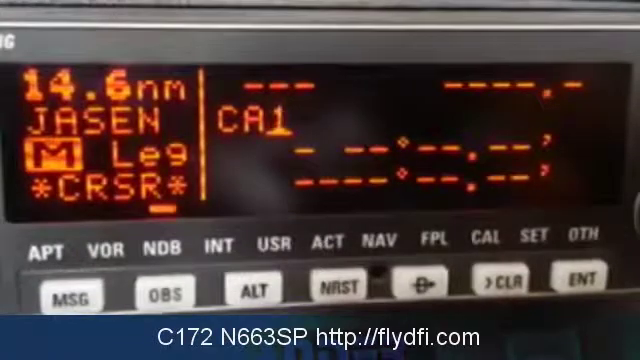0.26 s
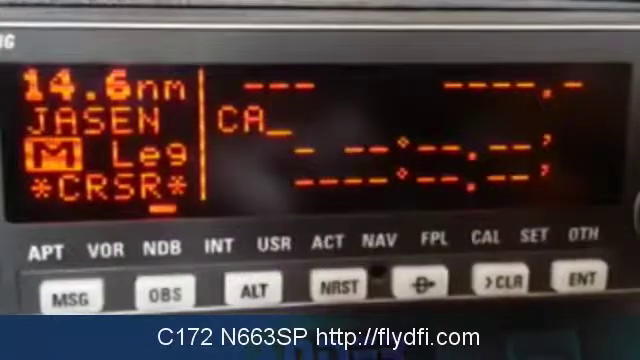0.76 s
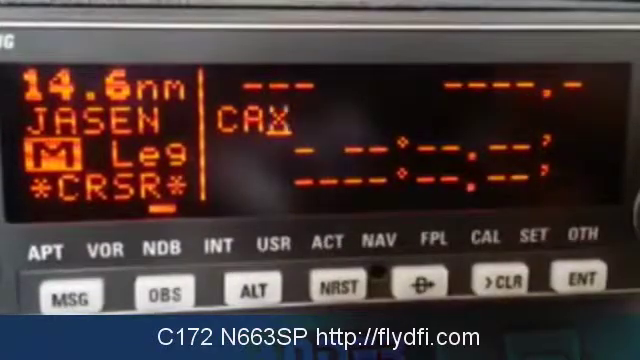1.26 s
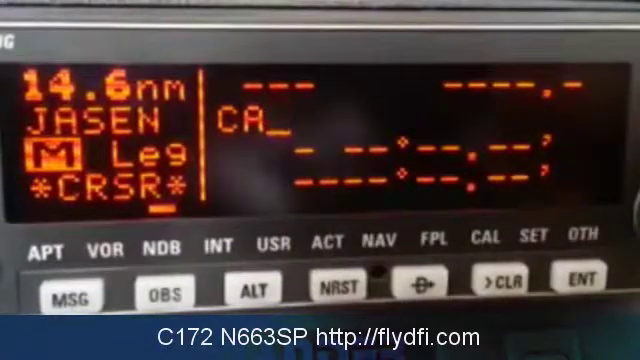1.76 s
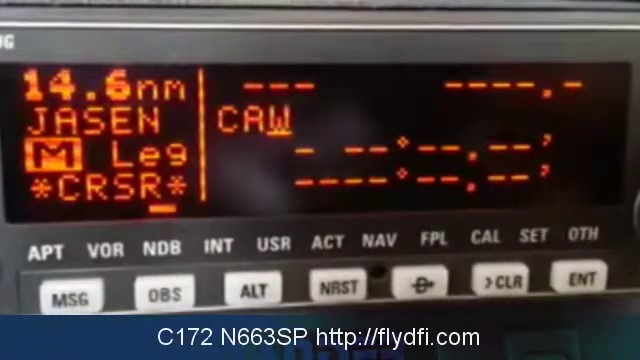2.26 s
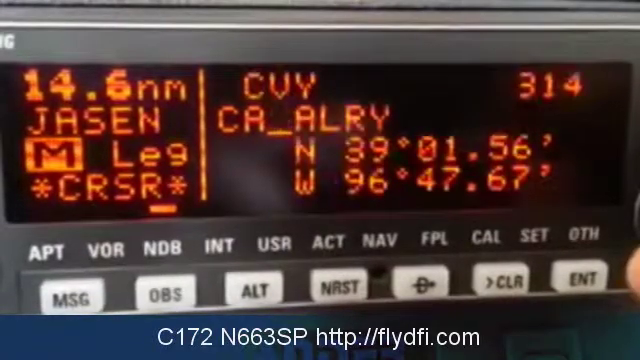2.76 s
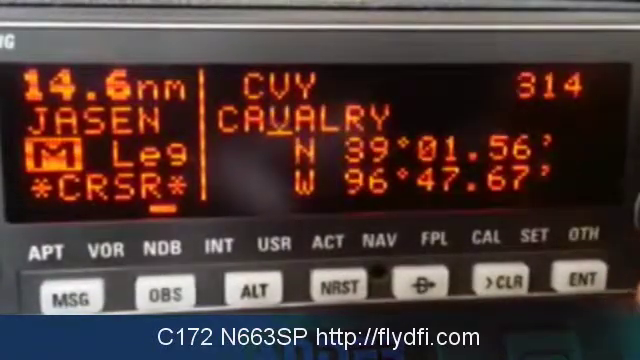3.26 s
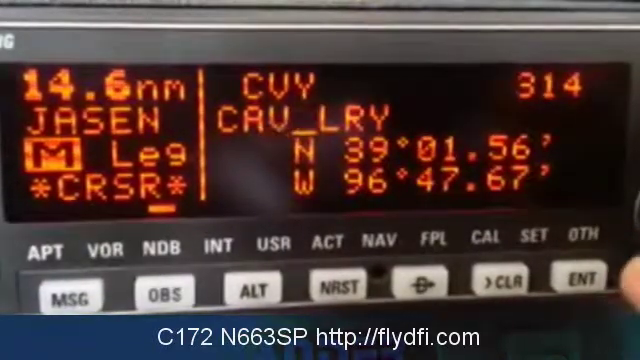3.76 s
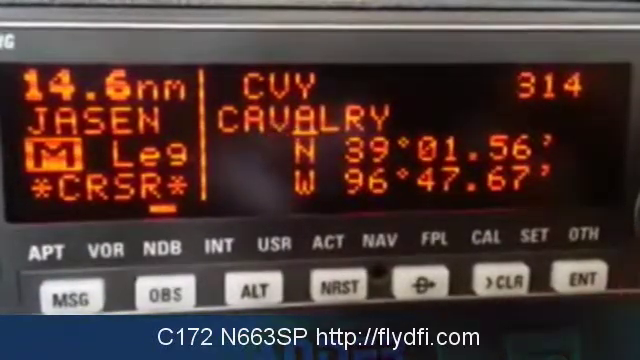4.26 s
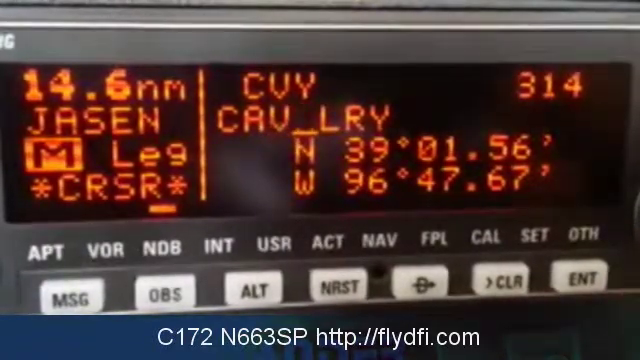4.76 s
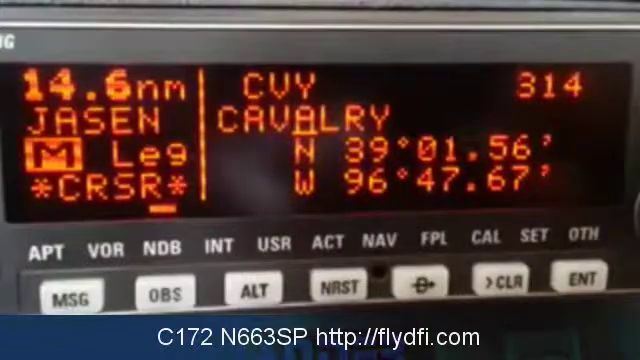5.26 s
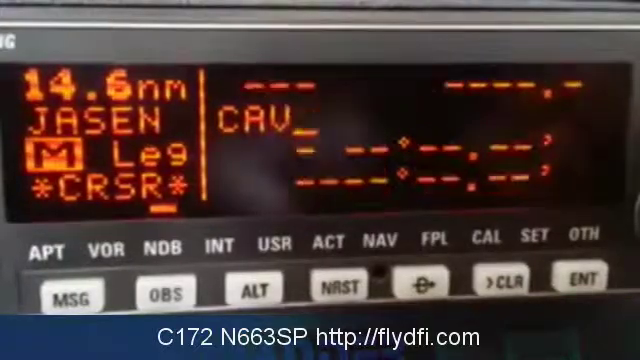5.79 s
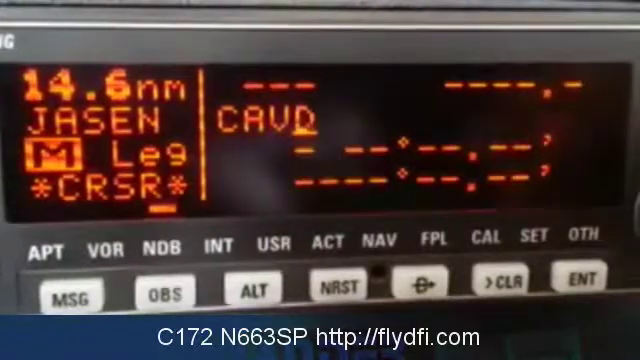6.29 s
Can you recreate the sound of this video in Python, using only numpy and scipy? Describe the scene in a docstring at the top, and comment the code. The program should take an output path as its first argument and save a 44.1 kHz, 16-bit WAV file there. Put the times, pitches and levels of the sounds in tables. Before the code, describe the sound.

A notched rotary knob on a panel-mounted navigation unit is turned step by step in a quiet, parked aircraft cockpit, heard close and in stereo. From 0.2 to 1.4 seconds come six sharp, unevenly spaced clicks, each a springy snap with slightly different tone, a tiny faceplate ring and a very short cabin reflection. A softer, tightly doubled click follows at about 2.3 seconds. Then there is a lull with barely audible finger rubs on the knob and soft hand bumps on the panel. A light, dry, bright tick sounds at 3.7 seconds and a tiny one at 5. Turning resumes with a hard click at 5.7 seconds and two somewhat softer ones at 5.9 and 6.3, the last with a faint dull bump. Very faint, steady rumble and hiss continue underneath throughout.

```python
"""Detented knob of a panel-mounted navigation unit, turned step by step in a quiet, parked cockpit.
At each step a spring rides up a cam and snaps into the next notch; knob and faceplate ring and the
small cabin answers. Fingers rub the knob and the hand bumps the panel, over faint rumble and hiss.
Heard close, in stereo. The hardest snaps clip briefly."""
import sys
import numpy as np
from scipy import signal
from scipy.fft import rfft, irfft
from scipy.io import wavfile
from scipy.ndimage import uniform_filter1d

SR = 44100
rng = np.random.default_rng(int(sys.argv[2]) if len(sys.argv) > 2 else 0)


def persist_wave(psi):
    """Save psi, clipped to +-1, as 16-bit WAV."""
    counts = np.round(np.clip(psi, -1, 1) * 32767).astype(np.int16)
    wavfile.write(sys.argv[1], SR, np.atleast_2d(counts).T)


N = 287884

# Inner knob steps. Each row: start in seconds, gain in dB, four tilts in dB (thump under 1 kHz,
# knock near 1.6 kHz, clack near 3.3 kHz, ping above 6 kHz), favoured ring in Hz, cancelled band in Hz.
INNER_STEPS = [(0.2075, -5.5, 5.5, 4, .5, 1.5, 3460, 2420), (0.3306, -10, 8.5, 4, 1, 2, 3940, 2300),
               (0.5746, -11.5, 6.5, -5, -1.5, 5, 7300, 2200), (0.9153, -9, 6, 0, 2, 3, 3100, 3780),
               (1.0562, -6, 4.5, -1.5, 0, .5, 2834, 3826), (1.4170, -8, -1.5, 1.5, 2.5, -2.5, 1550, 2293),
               (2.2495, -15, 5, 2, 1.5, -5, 1580, 3376), (2.2578, -19, 2, 3, 2, -3, 1600, 3600),
               (5.0036, -39, 7, -2.5, 2.5, 8, 10330, 2380), (5.667, -4.5, 1, -3.5, -2, -5.5, 3450, 4140),
               (5.9168, -12.5, 6.5, 3.5, -.5, -.5, 8800, 3440), (6.2819, -13, 8, 1.5, 7, 2, 1020, 2480)]
# One step of the outer ring: light, dry, bright. One row, same columns.
OUTER_RING_STEP = (3.7398, -24.5, 4.5, -9, -5, -1, 10470, 4040)
# Spring snap. Each row: frequency in Hz, relative density in dB.
SNAP_SPECTRUM = [(60, -38), (350, -28.5), (900, -19), (1500, -6), (2400, -7), (3300, -4), (5000, -2),
                 (6300, -1), (8000, 0), (9200, -8.5), (11000, -18)]
# Treble beamed at the right capsule. Each row: frequency in Hz, right minus left in dB.
SNAP_BEAM = [(1000, -3), (3400, -6), (6000, 1), (7200, 15), (8200, 8.5), (10000, 4.5)]
# Snap stereo image. Each row: frequency in Hz, left-right correlation.
SNAP_CORRELATION = [(300, .8), (1400, .2), (2300, .55), (5000, .15), (8000, -0.2)]
# Dense, short-lived faceplate modes. Each row: frequency in Hz, relative density in dB.
PLATE_SPECTRUM = [(60, -29), (350, -26.5), (900, -11), (1450, 0.5), (1900, 0), (2400, -7.5), (3300, 2),
                  (4800, 1.5), (6300, -0.5), (8000, -3), (9200, -11), (11000, -20.5)]
# Knob and faceplate modes. Each row: frequency in Hz, gain in dB, t60 in seconds, right minus left in dB.
KNOB_MODES = [(1457.5, -20.5, 0.048, -1), (1730, -19.5, .03, -3), (2790, -22, 0.02, -1),
              (3100, -17.5, .025, 0), (3620, -18, 0.015, 1.5), (4080, -15, .028, -1.5),
              (4860, -16.5, 0.029, -0.5), (5670, -16.5, 0.07, 2.5), (5980, -13.5, .025, 1),
              (6978, -11, 0.013, 13.5), (7520, -8.5, .011, 14.5), (9200, -20, 0.013, 5.5)]
# Cabin tail. Each row: frequency in Hz, relative density in dB.
CABIN_SPECTRUM = [(40, -10), (90, -2.5), (170, -12), (400, -9.5), (700, -8), (1100, -4), (1550, 1),
                  (2500, 4), (3200, -0.5), (4000, 1), (4800, 1), (6500, 1), (8000, -2), (8500, -8),
                  (9800, -6), (11000, -22.5)]
# Cabin stereo image. Each row: frequency in Hz, left-right correlation.
CABIN_CORRELATION = [(100, .4), (300, 0.66), (600, 0.39), (1400, 0.11), (2300, 0.13), (4000, .1),
                     (9000, 0.067)]
# Panel and cavity resonances in the tail. Each row: centre in Hz, width in Hz, lift in dB.
PANEL_RESONANCES = [(317.2, 45, 10.5), (522, 65, 8.5), (715, 83, 5), (810, 50, 6.5), (1131.5, 80, 5),
                    (1400, 25, 4), (1480, 50, 1.5), (1980, 71, 1), (3186, 170, 3), (4650, 250, 3),
                    (5250, 140, 3.5), (5620, 140, 2.5)]
# Brief level dips after three hard snaps. Each row: centre in seconds, gain in dB.
LEVEL_DIPS = [(0.2232, -60), (1.4313, -51), (5.685, -14)]
# Finger rubs on the knob. Each row: peak time in seconds, level in dB.
FINGER_RUBS = [(2.949, -53.5), (3.454, -63), (3.737, -47), (5.17, -63), (5.815, -61), (5.907, -50),
               (6.171, -50.5)]
# Sliding skin. Each row: frequency in Hz, relative density in dB.
RUB_SPECTRUM = [(30, -6), (100, 7), (400, 2.5), (1000, -6), (2500, -3.5), (4000, -6), (8000, -2),
                (11000, -10)]
# Catching skin. Each row: frequency in Hz, relative density in dB.
CATCH_SPECTRUM = [(1000, -20), (3000, -10), (4200, 0), (5500, -10), (11000, -14)]
# Hand bumps on the panel. Each row: start in seconds, gain in dB, resonance in Hz.
HAND_BUMPS = [(2.4065, -47, 440), (2.943, -51.5, 370), (4.025, -55.5, 519.5), (4.085, -61, 296.6),
              (6.284, -33, 530)]
# Background rumble and hiss. Each row: frequency in Hz, relative density in dB.
FLOOR_SPECTRUM = [(15, -36.5), (25, -13.5), (59, 3.5), (86, -6), (117, -1), (150, -5), (214, -5),
                  (403, -8.5), (457, -10), (635, -14), (976, -18), (4680, -20.5), (8580, -18), (10500, -29),
                  (13600, -54.5), (22000, -120)]
# Background stereo image. Each row: frequency in Hz, left-right correlation.
FLOOR_CORRELATION = [(50, .2), (300, .5), (1500, .3), (8000, 0.23)]

HIT_SAMPLES, LEAD_S = 16384, .02
HIT_GRID_HZ = np.fft.rfftfreq(HIT_SAMPLES, 1 / SR)


def knob():
    """The inner knob turns in runs; between them the outer ring moves one notch."""
    out = np.zeros((2, N))
    for start_s, *row in INNER_STEPS:
        add(out, detent(*row, ring_db=6.5, cabin_db=-12.8), start_s - LEAD_S)
    start_s, *row = OUTER_RING_STEP
    add(out, detent(*row, ring_db=19.5, cabin_db=-22.5), start_s - LEAD_S)
    return out


def detent(gain_db, thump_db, knock_db, clack_db, ping_db, ring_hz, hollow_hz, ring_db, cabin_db):
    """One step: snap, ring and a cabin tail of the same colour with a milder favoured ring."""
    t = np.arange(HIT_SAMPLES) / SR - LEAD_S
    tilts_db = thump_db, knock_db, clack_db, ping_db
    colour = (*tilts_db, ring_hz, ring_db, hollow_hz)
    tail_colour = (*tilts_db, ring_hz, .4 * ring_db, hollow_hz)
    ripple_db = chatter_db(HIT_GRID_HZ)
    panel_db = sum(db * bell(HIT_GRID_HZ, hz, width_hz) for hz, width_hz, db in PANEL_RESONANCES)
    direct = snap(t, hit_colour_db(HIT_GRID_HZ, *colour) + ripple_db) + ring(t, colour)
    tail = cabin(t, hit_colour_db(HIT_GRID_HZ, *tail_colour) + ripple_db + panel_db)
    lean_right = from_db(spread(1 + .3 * ping_db))
    return from_db(gain_db) * (lean_right * direct + from_db(cabin_db) * tail)


def snap(t, colour_db, contact_s=.0013, ride_db=-17):
    """The spring scrapes over the cam, chatters into its notch and excites the dense plate modes."""
    ride = from_db(ride_db) * decay(-t, t60_s=.01)
    contact = (t >= 0) * decay(np.maximum(t - contact_s, 0), t60_s=.006)
    beam_db = spread(at_hz(SNAP_BEAM, HIT_GRID_HZ))
    crack = burst(ride + contact, SNAP_SPECTRUM, SNAP_CORRELATION, colour_db + beam_db)
    plate = burst(decay(t, t60_s=.03), PLATE_SPECTRUM, SNAP_CORRELATION, colour_db)
    return from_db(-4) * crack + from_db(-5.5) * plate


def hit_colour_db(hz, thump_db, knock_db, clack_db, ping_db, ring_hz, ring_db, hollow_hz):
    """Grip and speed tilt each snap and favour one ring; the spring's bounce cancels one band."""
    tilt_db = at_hz([(700, thump_db), (1400, knock_db), (2000, knock_db), (3000, clack_db),
                     (3600, clack_db), (4500, 0), (5600, 0), (7000, ping_db)], hz)
    return tilt_db + ring_db * bell(hz, ring_hz, width_hz=600) - 13 * bell(hz, hollow_hz, width_hz=330)


def chatter_db(hz, scale_db=2.6):
    """Tiny impacts within a snap interfere, leaving ripples a few hundred Hz wide."""
    knots_hz = np.linspace(0, SR / 2, 140)
    ripple = rng.standard_normal(len(knots_hz))
    return scale_db * np.interp(hz, knots_hz, ripple - uniform_filter1d(ripple, size=5))


def ring(t, colour, scatter_db=1.5, left_lag_s=.0001):
    """Each snap strikes the modes with its own strengths; they reach the left capsule later."""
    out = 0
    age_s = t - np.array([[left_lag_s], [0]])
    for k, (hz, db, t60_s, right_db) in enumerate(KNOB_MODES):
        strength, detune = rng.standard_normal(2)
        gain = from_db(db + hit_colour_db(hz, *colour) + scatter_db * strength + spread(right_db))
        swing = (-1) ** k * np.cos(2 * np.pi * hz * (1 + .012 * detune) * age_s)
        out = out + gain * decay(age_s, t60_s) * swing
    return out


def cabin(t, colour_db, build_s=.004, late_db=-35.5):
    """Reflections off close walls and windows thicken and die fast; a faint late ring remains."""
    build = 1 - np.exp(-np.maximum(t, 0) / build_s)
    fall = np.hypot(decay(t, t60_s=.168), from_db(late_db) * decay(t, t60_s=.51))
    return burst(build * fall, CABIN_SPECTRUM, CABIN_CORRELATION, colour_db)


def dip_gain(half_width_s=.0053):
    """The knob's level dips briefly."""
    t = np.arange(N) / SR
    return from_db(sum(db * np.exp(-((t - s) / half_width_s) ** 4) for s, db in LEVEL_DIPS))


def fingers(rub_tau_s=.021, catch_tau_s=.0016, catch_lift_db=6):
    """Skin slides on the ribbed knob in swells of hiss and catches at the top of each."""
    t = np.arange(N) / SR
    swell, catch = (sum(from_db(db) * np.exp(-abs(t - s) / tau_s) for s, db in FINGER_RUBS)
                    for tau_s in (rub_tau_s, catch_tau_s))
    slide = swell * noise(RUB_SPECTRUM, CABIN_CORRELATION, N)
    scrape = catch * noise(CATCH_SPECTRUM, CABIN_CORRELATION, N)
    return slide + from_db(catch_lift_db) * scrape


def bumps(attack_s=.002, t60_cycles=40, puff_db=-3.5):
    """A soft hand contact wakes a low panel resonance and a dull puff around it."""
    out = np.zeros((2, N))
    t = np.arange(HIT_SAMPLES) / SR
    for start_s, db, hz in HAND_BUMPS:
        spectrum = [(hz / 4, -14), (hz, 0), (hz * 2, -11), (hz * 4, -40)]
        puff = from_db(puff_db) * noise(spectrum, CABIN_CORRELATION, HIT_SAMPLES)
        envelope = (1 - np.exp(-t / attack_s)) * decay(t, t60_cycles / hz)
        add(out, from_db(db) * envelope * (np.sin(2 * np.pi * hz * t) + puff), start_s)
    return out


def background(rms_db=-67.5):
    """Faint, steady rumble and hiss."""
    return from_db(rms_db) * noise(FLOOR_SPECTRUM, FLOOR_CORRELATION, N)


def burst(envelope, spectrum, correlation, colour_db):
    """Noisy push through a minimum-phase filter, so every peak rings on after it."""
    cepstrum = irfft(np.log(unit_gain(spectrum, HIT_SAMPLES) * from_db(colour_db)))
    cepstrum[..., 1:HIT_SAMPLES // 2] *= 2
    cepstrum[..., HIT_SAMPLES // 2 + 1:] = 0
    push = envelope * irfft(white_pair(correlation, HIT_SAMPLES))
    return irfft(rfft(push) * np.exp(rfft(cepstrum)))


def noise(spectrum, correlation, samples):
    """Steady stereo noise, rms 1."""
    return irfft(white_pair(correlation, samples) * unit_gain(spectrum, samples), samples)


def white_pair(correlation, samples):
    """Spectra of two correlated white noises."""
    mid, side = rfft(rng.standard_normal((2, samples)))
    alike = np.clip(at_hz(correlation, np.fft.rfftfreq(samples, 1 / SR)), -1, 1)
    return np.sqrt((1 + alike) / 2) * mid + np.sqrt((1 - alike) / 2) * side * [[1], [-1]]


def unit_gain(spectrum, samples):
    """FFT gains that shape white noise and keep its rms."""
    gain = from_db(at_hz(spectrum, np.fft.rfftfreq(samples, 1 / SR)))
    return gain / np.sqrt(np.mean(gain ** 2))


def at_hz(points, hz):
    """Interpolate over log frequency."""
    knots_hz, values = np.transpose(points)
    return np.interp(np.log(hz + 1), np.log(knots_hz), values)


def bell(hz, centre_hz, width_hz):
    """Gaussian of height 1; width at half height."""
    return np.exp(-np.log(2) * np.square(2 * (hz - centre_hz) / width_hz))


def decay(t, t60_s):
    """Zero before t = 0, then down 60 dB per t60_s."""
    return (t >= 0) * from_db(-60 * np.maximum(t, 0) / t60_s)


def spread(right_db):
    """Split right-minus-left dB over both channels."""
    return np.array([[-.5], [.5]]) * right_db


def from_db(db):
    return 10 ** (np.asarray(db) / 20)


def add(out, sound, start_s):
    """Mix a sound in at start_s."""
    start = round(start_s * SR)
    out[:, start:start + sound.shape[1]] += sound[:, :N - start]


def scene():
    """Knob and hand over the background."""
    floor = background()
    return dip_gain() * knob() + fingers() + bumps() + floor


def record(dry):
    """The hardest peaks clip; a steep low-pass cuts the top."""
    cutoff_hz = 10750
    lowpass = signal.ellip(10, .1, 70, cutoff_hz, fs=SR, output="sos")
    return signal.sosfilt(lowpass, np.clip(dry, -1, 1))


dry = scene()
out = record(dry)
persist_wave(out)
```